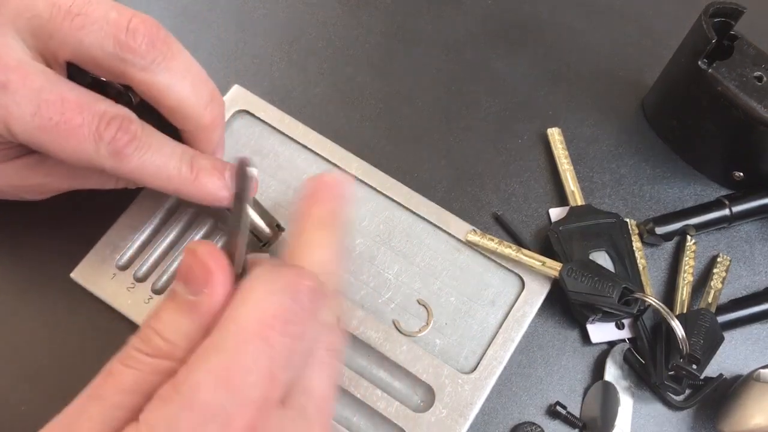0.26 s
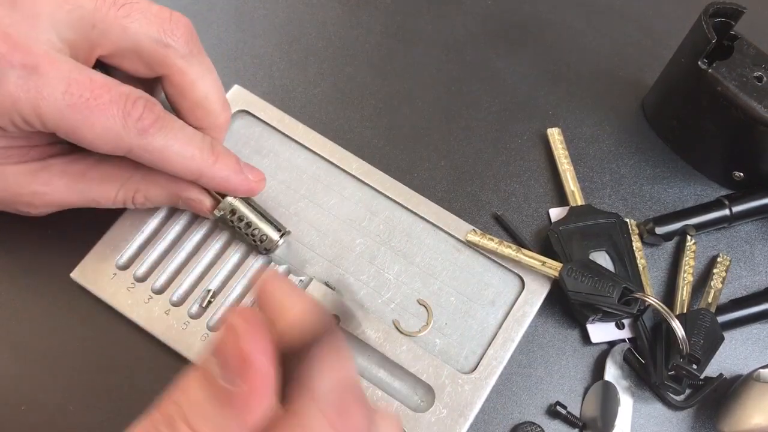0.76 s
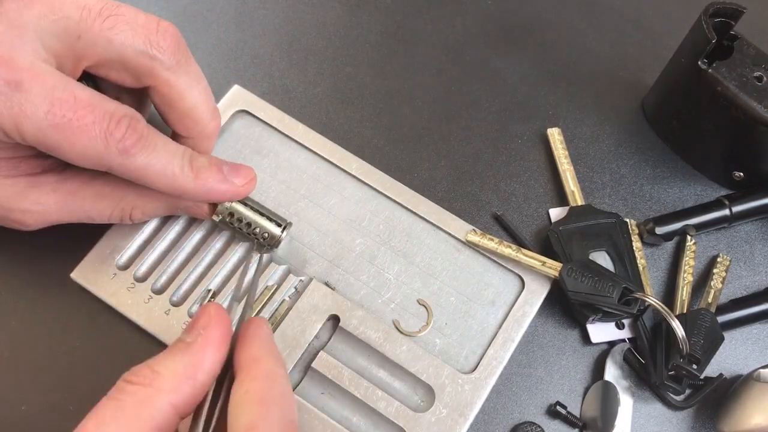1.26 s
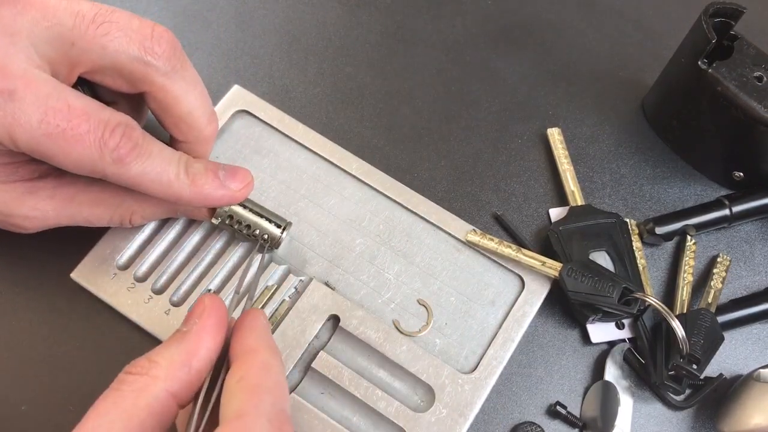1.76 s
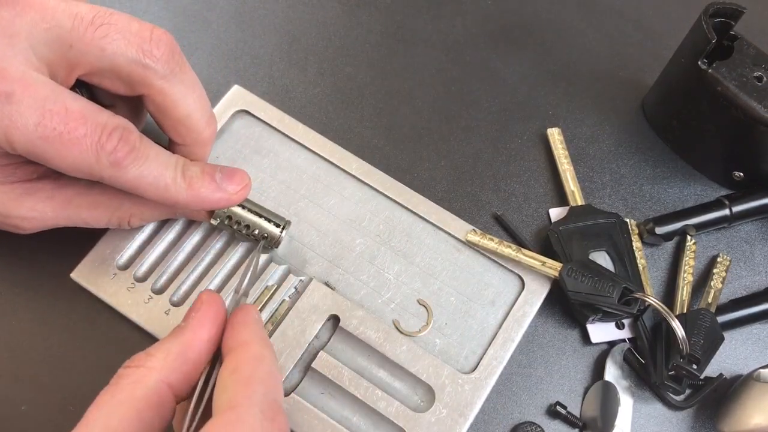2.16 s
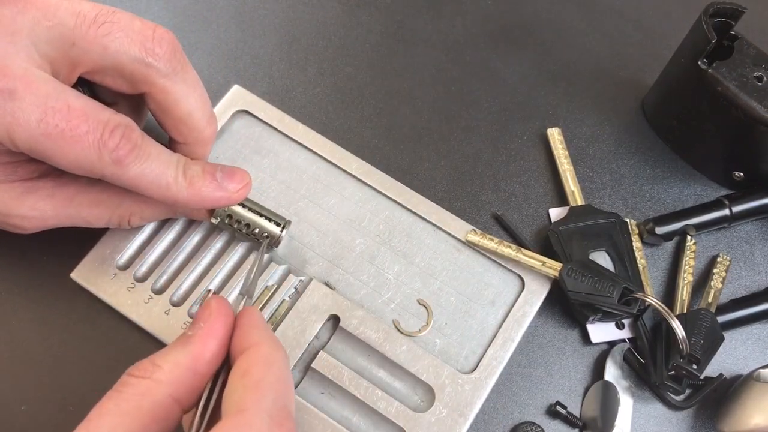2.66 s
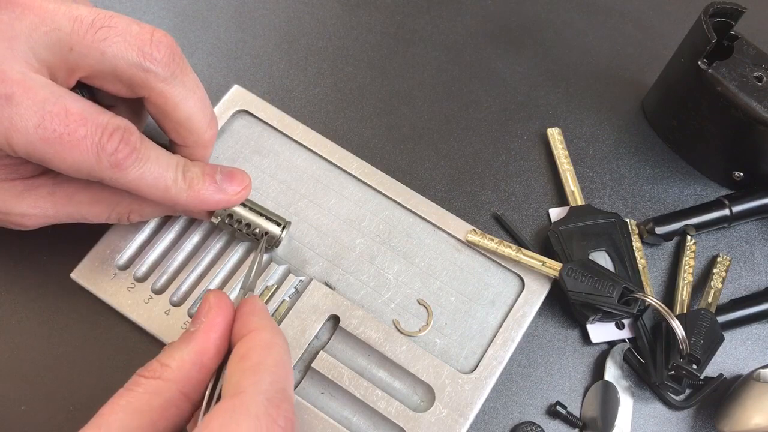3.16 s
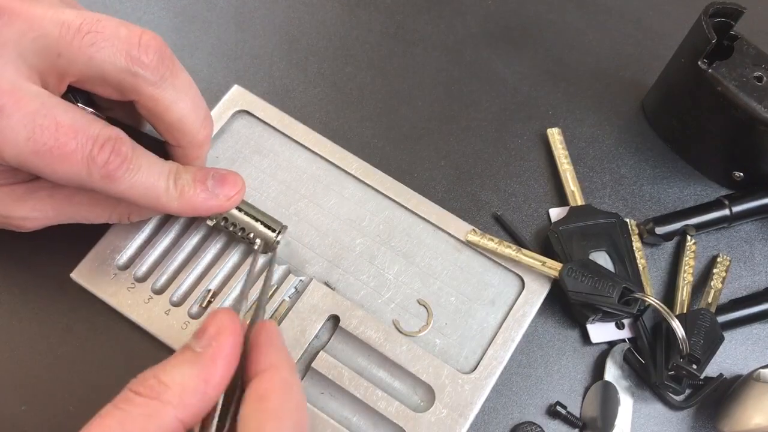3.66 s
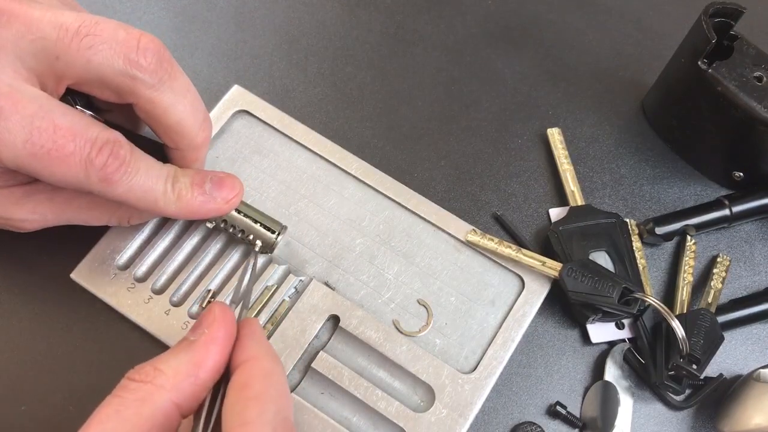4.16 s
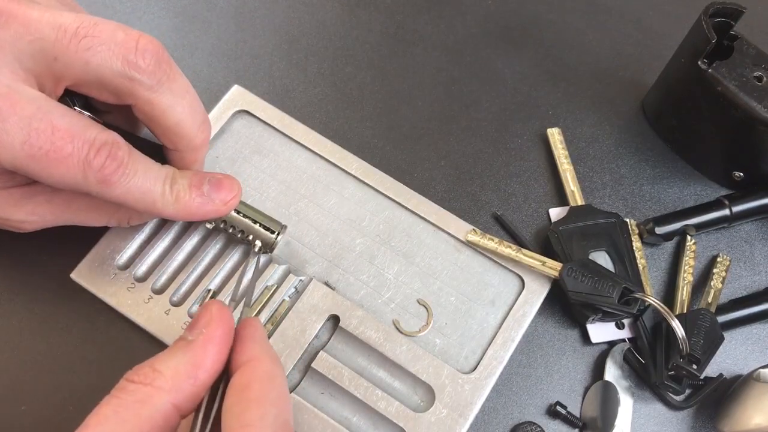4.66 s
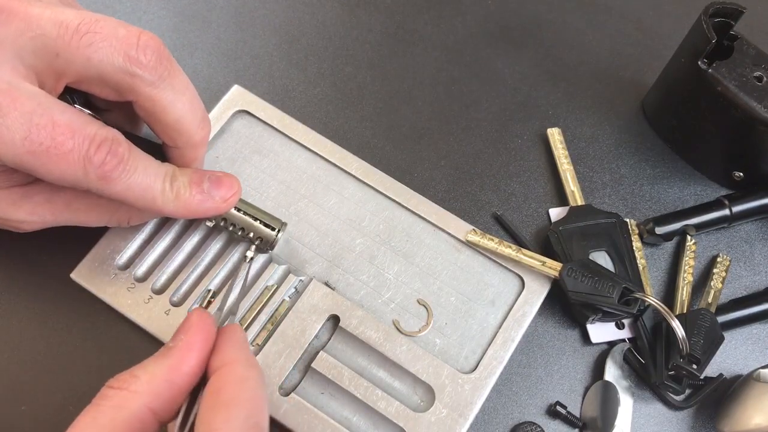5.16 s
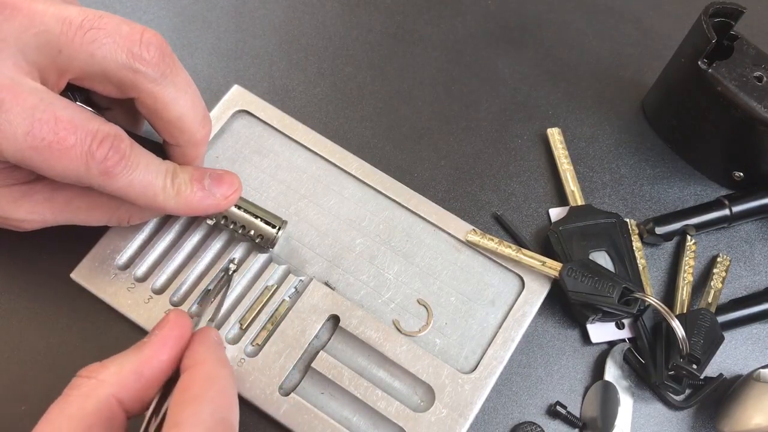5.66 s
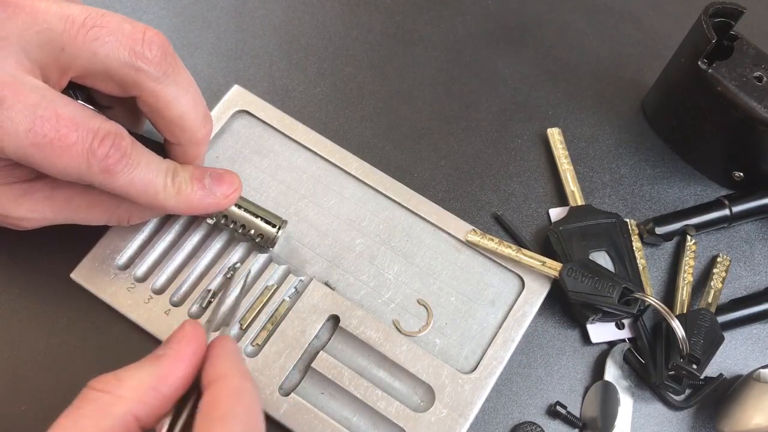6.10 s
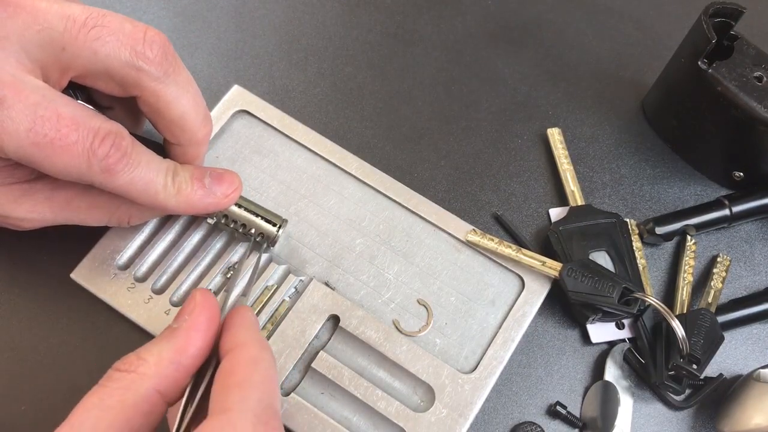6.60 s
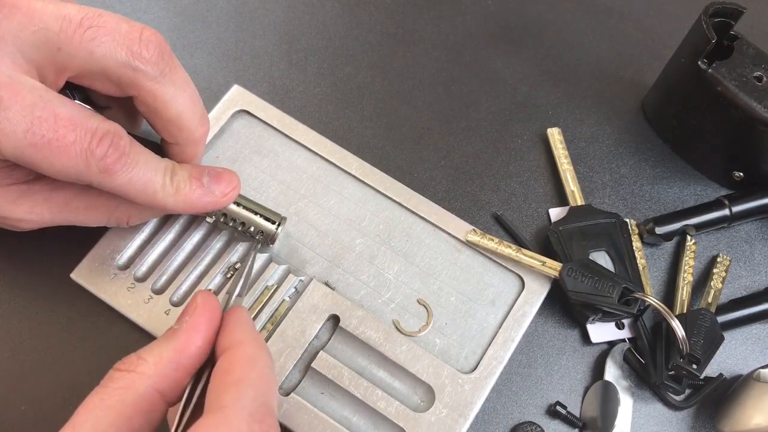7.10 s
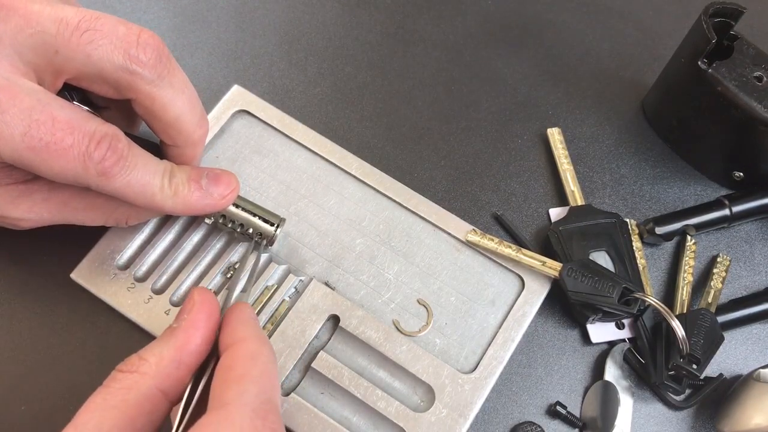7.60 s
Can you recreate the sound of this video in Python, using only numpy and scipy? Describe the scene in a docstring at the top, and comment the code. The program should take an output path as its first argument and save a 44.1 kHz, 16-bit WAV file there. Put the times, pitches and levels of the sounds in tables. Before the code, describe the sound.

A very loud, sharp metal clack opens close to the microphone, followed by a busy second of much softer knocks, rattles and low desk thumps. Things then settle into near silence with isolated clicks: a firm double tap just after two seconds, another after three, a cluster of bright tweezer ticks around four, and very faint taps to the end. A soft low rumble, faint drone and steady hiss lie beneath in a small quiet room.

```python
"""An aluminium tray on a desk, knocked by a lock cylinder and fingers as tweezers lift out the pins:
each blow rings decaying tray modes and adds a gripped clack; separate thumps boom the desk modes.
Steel tips tick as filtered noise slips that ring the pins; sliding metal scrapes as dense noise grains.
Close to a phone in a small quiet room: a short diffuse tail, shaped noise for the air rumble and
a low drone, both swelling now and then, and steady microphone hiss."""
import sys
import numpy as np
from scipy import signal
from scipy.fft import rfft, irfft
from scipy.io import wavfile
from scipy.ndimage import uniform_filter1d

SR = 44100
rng = np.random.default_rng(int(sys.argv[2]) if len(sys.argv) > 2 else 0)


def voltage_ratio(level):
    """Linear amplitude factor for a level in decibels (scalar or array-like)."""
    return 10 ** (np.asarray(level, float) / 20)


def generate_wav(signal):
    """Clip the signal to [-1, 1] and save it as 16-bit WAV at the path in sys.argv[1]."""
    frames = np.transpose(np.atleast_2d(signal))
    scaled = np.clip(frames, -1, 1) * 32767
    pcm = np.round(scaled).astype(np.int16)
    wavfile.write(sys.argv[1], SR, pcm)


N = 345744

# air rumble spectrum, relative: pitch_hz, level_db (per Hz)
RUMBLE_SPECTRUM = [(2.4, -30), (4.0, 2.5), (18, 1), (30, -12), (41, -8), (54, -15), (71, -37), (80, -30),
                   (100, -65.5), (180, -120)]
# the rumble swells, probably as the hands lean on the desk: top_s, top_db, half_length_s
RUMBLE_RISES = [(.15, -37.5, 0.071), (.3, -44.5, 0.051), (0.468, -40.5, 0.082), (0.759, -42.5, 0.069),
                (1.05, -49.5, 0.09), (2.16, -50, .08), (2.68, -49, .08), (2.996, -47.5, 0.11),
                (3.38, -38.5, 0.075), (6.38, -47.5, 0.053), (7.702, -51, 0.11)]
# room resonances heard as a drone, relative: pitch_hz, width_hz, level_db
DRONE_RESONANCES = [(113, 7.8, -5), (223.5, 8.1, -0.5), (270.5, 19, -1), (336, 84, -7.5), (490, 14, -16.5),
                    (570, 20, -20)]
# swells of the drone: top_s, top_db, half_length_s
DRONE_RISES = [(0.103, -65, .3), (2.65, -58.5, 0.052), (2.838, -59.5, .06), (3.05, -68, 0.18),
               (6.35, -71, .1)]
# microphone hiss spectrum, relative: pitch_hz, level_db (per Hz)
HISS_SPECTRUM = [(47, -30.5), (80, 0.5), (171, -6), (233, -4.5), (445, -17), (972, -18), (1060, -18.5),
                 (1140, -20.5), (15700, -26.5), (16100, -59)]
# blows on the tray: start_s, peak_db, favoured_hz, rattle_ms, dullness (0 free - 1 gripped)
TRAY_BLOWS = [(0.0378, -31.5, 9000, 0.44, 0.74), (0.045, -1.5, 4930, 0.55, 0.29),
              (.184, -29.5, 3540, 0.52, 0.29), (.240, -41, 5110, 1.6, 0.29), (.274, -55.5, 1130, 7.4, .1),
              (0.427, -38, 1300, 4.6, 0.44), (.445, -47.5, 1140, 14, .3), (.466, -49.5, 3560, 4.3, .05),
              (.478, -39, 3440, 1.7, 0.1), (.499, -37, 2760, 1.4, .2), (.55, -48, 1160, 47, 0.31),
              (0.593, -41, 2130, 3.3, 0.97), (.611, -39, 3130, 5, .13), (.625, -41, 960, 10.6, 0.4),
              (.64, -53, 2480, 13, 0.048), (.673, -46, 2500, 1.8, .3), (0.679, -48.5, 780, 7.4, 0.43),
              (.73, -53, 2460, 12, 0.66), (.803, -59.5, 1150, 3.8, .7), (.96, -66.5, 1153, 24, 0.36),
              (.985, -63, 3540, 5, 0.22), (1.199, -60, 1146, 3, .2), (1.59, -52.5, 1290, 1.2, 0.54),
              (1.665, -58.5, 1200, 1.2, 0.59), (1.885, -66.5, 1150, 4.9, .2), (2.217, -34, 1000, 6.8, 0.36),
              (2.222, -33.5, 5000, 3.1, 0.56), (2.232, -42, 820, 4, 0.5), (2.555, -60, 1148, 11, .18),
              (2.576, -53, 3000, 1.2, .9), (2.615, -65, 1160, 6, 0.33), (2.957, -58.5, 1151, 2.9, .63),
              (3.277, -38.5, 1160, 2.5, 0.59), (3.283, -40.5, 3400, 2.6, 0.58),
              (3.38, -53.5, 1100, 1.1, .85), (3.949, -50.5, 1188, 8.7, 0.57),
              (4.297, -47.5, 900, 6.2, 0.77), (4.308, -54, 2680, 0.61, 0.52),
              (5.199, -58.5, 1148, 4.8, .62), (5.598, -54.5, 3000, 0.45, 0.92),
              (5.631, -57, 1000, 7.1, 0.58), (5.705, -59, 1090, 2.8, .54), (5.811, -63.5, 1145, 4.1, .32),
              (6.18, -59, 767, 2.2, .62), (6.319, -62, 900, 6, 0.58), (6.72, -65, 800, 3, .6),
              (6.799, -54, 1300, 1.2, 0.55), (6.91, -65.5, 1150, 2.4, .3), (7.31, -66, 1150, 8, .4),
              (7.638, -52.5, 1300, 1.1, 0.59), (7.67, -64.5, 1140, 23, 0.5), (7.738, -66.5, 1150, 4.7, .3)]
# ringing modes of the aluminium tray: pitch_hz
TRAY_MODE_HZ = [775, 1115, 1152, 1180, 1367, 2498, 2556, 2660, 3050, 3200, 3540, 3585, 3683, 3781, 3934,
                4483, 5027, 5172, 5424, 5701, 6864, 7330, 7724, 7825, 8166, 9130, 10060, 10960, 11900,
                12830, 14200]
# strength and free decay of each of those modes: level_db, t60_s
TRAY_MODE_DECAY = [(-25, .06), (-11.5, 0.047), (-9, 0.089), (-12.5, .045), (-20.5, 0.052), (-19.5, 0.11),
                   (-15, 0.033), (-15, .035), (-20, .04), (-20, .04), (-12.5, .1), (-10, 0.04),
                   (-6.5, 0.021), (-13.5, .025), (-20, 0.033), (-22, 0.022), (-15.5, .025), (-4.5, 0.056),
                   (-18, 0.041), (-20.5, 0.096), (-16, .05), (-23.5, .05), (-15, 0.15), (-10.5, .06),
                   (-18.5, .035), (-23, .03), (-18, .06), (-21, .05), (-21.5, 0.045), (-23.5, .03),
                   (-20.5, .03)]
# blows that reach the desk: start_s, peak_db
DESK_BLOWS = [(.044, -34), (0.237, -37.5), (.424, -30), (.466, -44.5), (.498, -47), (.592, -51.5),
              (0.612, -56), (2.218, -39.5), (2.230, -43.5), (2.559, -56.5), (3.278, -44.5), (3.38, -57),
              (3.949, -56), (4.175, -63), (4.3, -59), (5.631, -64), (7.639, -62.5)]
# modes of the desk top: pitch_hz, level_db, t60_s
DESK_MODES = [(45, -9.5, 0.16), (113, -2.5, 0.31), (183, 2, 0.12), (275, -4.5, 0.06), (358, -7, .08),
              (455, -11.5, .07), (650, -18.5, .05), (775, -17.5, .05)]
# steel tips on brass: peak_s, peak_db, centre_hz, rise_ms, pin_ring_db
TIP_TICKS = [(.0455, -17.5, 10700, .3, -44.5), (.430, -43, 5160, 3.7, -38), (.718, -49.5, 5900, 1.2, -38.5),
             (.732, -53, 5240, 1.1, -41), (2.079, -53.5, 6980, 0.89, -39.5), (2.2194, -25, 11810, 2, -36),
             (2.2227, -26.5, 4620, 1.1, -24), (2.5677, -42.5, 14130, 1.4, -36),
             (2.57, -37.5, 8770, 3.5, -25), (2.959, -59, 5510, 1.29, -40.5), (3.2767, -46.5, 9060, .8, -40),
             (3.2828, -26, 10300, 2.5, -29.5), (3.949, -47.5, 8500, 1.1, -32),
             (3.962, -47.5, 11840, .97, -26.5), (4.178, -43.5, 6460, 3.2, -32),
             (4.19, -60.5, 7500, .6, -41.5), (4.2952, -51, 13500, .9, -43.5), (4.298, -40, 6470, 3.2, -31),
             (4.3056, -40, 7870, 5.3, -26), (4.3079, -30.5, 6800, 0.47, -22),
             (4.410, -54, 8440, 1.2, -25.5), (5.635, -61.5, 4650, 0.97, -14.5),
             (5.843, -41, 12460, 1.5, -28.5), (5.843, -40.5, 8200, 1.4, -19),
             (5.843, -48.5, 5000, 1.1, -17), (6.758, -58.5, 5410, 1.1, -16.5),
             (6.759, -59.5, 8400, 1.08, -25)]
# ringing modes of a lock pin: pitch_hz, level_db, t60_s
PIN_MODES = [(4650, -6, .05), (5300, -8, .02), (6200, -4, .025), (6760, -10, .09), (8400, 0, .035),
             (8900, -4, .035), (11700, -2, .025), (13300, -6, .02), (14600, -5, .02)]
# metal sliding over the tray, a pin or a groove: start_s, end_s, level_db, centre_hz
METAL_SCRAPES = [(0.877, 1.059, -77.5, 7500), (.9, 1.029, -78.5, 13500), (3.954, 3.991, -66.5, 9600),
                 (4.055, 4.09, -80, 7020), (6.877, 6.97, -73.5, 6500), (6.992, 7.04, -73, 5980)]

RUMBLE_REST_DB, RUMBLE_WANDER_DB = -53.5, 2.5
DRONE_REST_DB, DRONE_WANDER_DB = -71.5, 1
WANDER_S = 0.17  # averaging time of the slow wander
HISS_DB = -69
# low-sounding blows are soft ones: contact time at 1 kHz, and how fast it shortens as the favoured pitch rises
CONTACT_MS, CONTACT_SLOPE = 0.2, 1
# contact at -60 dB; it shortens as the thump grows louder
THUMP_MS, THUMP_MS_PER_DB = .32, -0.07
DESK_BUILD_S = .028  # build-up time of a desk mode at 100 Hz; it shrinks with the square of the pitch
TICK_FALL_MS, FALL_PER_RISE = 1.5, .3  # a slower slip also dies slower
TIPS_LOW_HZ = 4300  # the small tips radiate little below this
TIPS_ROOM_DB = -6.5  # the tips sound between the hands, so less of them reaches the walls
ROOM_T60_S, ROOM_TREBLE_T60_S = .24, .17
ROOM_DB, ROOM_TREBLE_DB = -13, -4.5


def peak(x):
    """Scale to peak 1."""
    return x / np.abs(x).max()


def add(out, s, x, db):
    """Mix x in at s seconds with the given peak."""
    i = int(s * SR)
    out[i:i + len(x)] += voltage_ratio(db) * peak(x)[:N - i]


def decay(t, t60):
    """Exponential fade by 60 dB in t60 seconds."""
    return np.exp(-np.log(1000) * t / t60)


def ring(modes, length_s, gains):
    """Impulse response of a struck body: a sum of decaying sine modes."""
    t = np.arange(int(length_s * SR)) / SR
    hz, db, t60 = np.transpose(modes)[:, :, None]
    sines = np.sin(2 * np.pi * hz * t)
    return (gains[:, None] * voltage_ratio(db) * sines * decay(t, t60)).sum(axis=0)


def colour(x, points):
    """Filter by (Hz, dB) points, joined along log pitch; rms 1."""
    hz, db = np.transpose(points)
    f = np.arange(len(x) // 2 + 1) * SR / len(x) + 1e-3  # keeps the logarithm finite at 0 Hz
    gain = voltage_ratio(np.interp(np.log(f), np.log(hz), db))
    y = irfft(rfft(x) * gain, len(x))
    return y / np.std(y)


def band(x, hz, width_hz):
    """Resonance with gain 1 at its centre."""
    return signal.lfilter(*signal.iirpeak(hz, hz / width_hz, fs=SR), x)


def push(ms):
    """Force of a contact, greatest after ms: longer means softer and duller."""
    t = np.arange(400) / SR * 1000 / max(ms, .004)
    return (t / .5) ** 2 * np.exp(-t / .5)


def swelling(rest_db, wander_db, swells):
    """Gain that wanders slowly about a resting level and rises in bell-shaped swells."""
    t = np.arange(N) / SR
    k = int(WANDER_S * SR)
    wander = uniform_filter1d(uniform_filter1d(rng.standard_normal(N), size=k), size=k)
    power = voltage_ratio(rest_db + wander_db * wander / np.std(wander)) ** 2
    for top_s, top_db, half_s in swells:
        power = power + voltage_ratio(top_db) ** 2 * np.exp(-((t - top_s) / half_s) ** 2)
    return np.sqrt(power)


def background():
    """Air rumble and a drone in a few room resonances swell and fade over steady hiss."""
    rumble = colour(rng.standard_normal(N), RUMBLE_SPECTRUM)
    rumble = rumble * swelling(RUMBLE_REST_DB, RUMBLE_WANDER_DB, RUMBLE_RISES)
    source = rng.standard_normal(N)
    drone = np.zeros(N)
    for hz, width, db in DRONE_RESONANCES:
        resonance = band(band(source, hz, width), hz, 4 * width)
        drone += voltage_ratio(db) / np.sqrt(width) * resonance
    drone = drone / np.std(drone) * swelling(DRONE_REST_DB, DRONE_WANDER_DB, DRONE_RISES)
    hiss = colour(rng.standard_normal(N), HISS_SPECTRUM) * voltage_ratio(HISS_DB)
    return rumble + drone + hiss


def knocks():
    """Each blow is a first touch and a short rattle; the spot struck favours some tray modes."""
    out = np.zeros(N)
    t_ms = np.arange(4096) / SR * 1000
    tray = np.column_stack([TRAY_MODE_HZ, TRAY_MODE_DECAY])
    signs = (-1.) ** np.arange(len(tray))  # neighbouring modes start in opposite directions, so the ring swells in
    grit = rng.standard_normal((len(TRAY_BLOWS), len(t_ms)))
    # the many weak modes between the listed ones blur into a short wash
    fade = decay(np.arange(int(.25 * SR)) / SR, .07)
    wash = voltage_ratio(-17) * band(rng.standard_normal(len(fade)), 2800, 5000) * fade
    for (s, db, hz, rattle_ms, dull), g in zip(TRAY_BLOWS, grit):
        contact_ms = CONTACT_MS * (1000 / hz) ** CONTACT_SLOPE
        dull = np.clip(dull, 0, 1)
        octaves = np.log2(tray[:, 0] / hz)
        spot = signs * voltage_ratio(9.7 * np.exp(-(octaves / 0.2) ** 2))
        touches = 0.023 * g ** 3 * np.exp(-t_ms / max(rattle_ms, .05))
        touches[0] = 1
        # a grip shortens the ring and leaves the dead clack of the contact
        modes = tray * [1, 1, 1 - 0.89 * dull]
        force = np.convolve(touches, push(contact_ms))
        body = (1 - dull) * peak(signal.fftconvolve(force, ring(modes, .25, spot) + wash))
        rub = g * np.exp(-t_ms / (max(rattle_ms, 0) + 1.8))
        clack = band(np.convolve(rub, push(0.65 * contact_ms)), hz, 2.6 * hz)
        body[:len(clack)] += dull * peak(clack)
        add(out, s, body, db)
    return out


def room(x):
    """Diffuse tail of desk and walls; the treble dies first."""
    t = np.arange(SR // 2) / SR
    low = band(rng.standard_normal(len(t)), 1700, 7000) * decay(t, ROOM_T60_S)
    high = band(rng.standard_normal(len(t)), 7600, 13000) * decay(t, ROOM_TREBLE_T60_S)
    tail = (low + voltage_ratio(ROOM_TREBLE_DB) * high) * np.minimum(t / .006, 1)  # builds up over 6 ms
    tail = tail / np.sqrt(np.sum(tail ** 2))
    return voltage_ratio(ROOM_DB) * signal.fftconvolve(x, tail)[:N]


def thumps():
    """The desk top booms under the tray; its lowest modes come late, so the thud slides downward."""
    out = np.zeros(N)
    t = np.arange(SR // 2) / SR
    desk = np.zeros(len(t))
    for mode in DESK_MODES:
        build_s = DESK_BUILD_S / (mode[0] / 100) ** 2
        desk += ring([mode], .5, -np.ones(1)) * (1 - np.exp(-t / build_s)) ** 2
    for s, db in DESK_BLOWS:
        contact_ms = THUMP_MS + THUMP_MS_PER_DB * (db + 60)
        add(out, s, np.convolve(desk, push(contact_ms)), db)
    return out


def ticks():
    """A short gritty slip of the tips, bright around its centre, that sets the nearest pin modes ringing."""
    out = np.zeros(N)
    t_ms = np.arange(2048) / SR * 1000
    thin = signal.butter(3, TIPS_LOW_HZ, "high", fs=SR, output="sos")
    grit = rng.standard_normal((len(TIP_TICKS), len(t_ms)))
    for (s, db, hz, rise, ring_db), g in zip(TIP_TICKS, grit):
        rise = max(rise, .05)
        fall = np.exp(-(t_ms - rise) / (TICK_FALL_MS + FALL_PER_RISE * rise))
        slip = g * np.where(t_ms < rise, (t_ms / rise) ** 2, fall)
        slip = signal.sosfilt(thin, band(band(slip, hz, 6700), hz, 9000))
        octaves = np.log2(np.array(PIN_MODES)[:, 0] / hz)
        pin = ring(PIN_MODES, .1, voltage_ratio(-200 * octaves ** 2))
        rung = voltage_ratio(ring_db) * signal.fftconvolve(slip, pin)
        add(out, s - rise / 1000, np.pad(slip, (0, len(pin) - 1)) + rung, db)
    return out


def scrapes():
    """Dense uneven grains that faintly excite the pin while metal slides."""
    t = np.arange(N) / SR
    unevenness = uniform_filter1d(rng.standard_normal(N), size=300) * np.sqrt(300)  # rms near 1
    grains = rng.standard_normal(N) * voltage_ratio(3.3 * unevenness)
    pin = ring(PIN_MODES, .1, np.ones(len(PIN_MODES)))
    rung = grains + voltage_ratio(-32) * signal.fftconvolve(grains, pin)[:N]
    out = np.zeros(N)
    for start, end, db, hz in METAL_SCRAPES:
        span = (t > start) & (t < end)
        part = band(band(rung[span], hz, 1.3 * hz), hz, 1.3 * hz)
        out[span] += voltage_ratio(db) * part / np.std(part) * signal.windows.tukey(len(part), .5)
    return out


def scene():
    """Contacts, their room tail and the background."""
    tray = knocks() + thumps()
    tips = ticks() + scrapes()
    tail = room(tray + voltage_ratio(TIPS_ROOM_DB) * tips)
    return (tray + tips + tail + background())[None]


def roll_off(x):
    """The treble ends steeply here."""
    return signal.sosfilt(signal.butter(12, 16820, fs=SR, output="sos"), x)


def record(dry):
    """The finished mix as it leaves the phone."""
    return roll_off(dry)


dry = scene()
out = record(dry)
generate_wav(out)
```